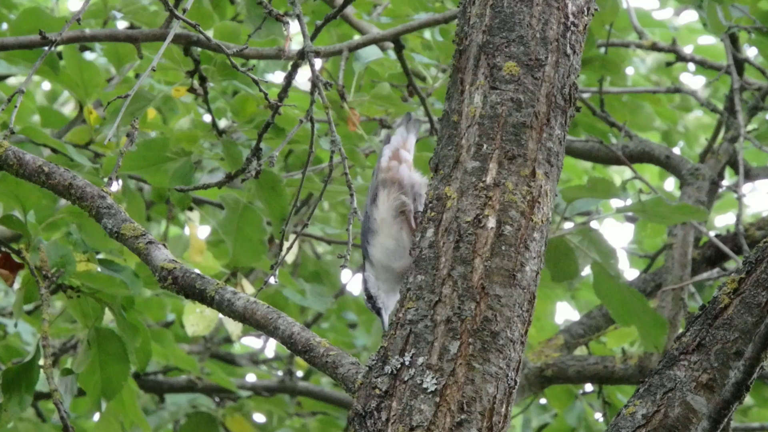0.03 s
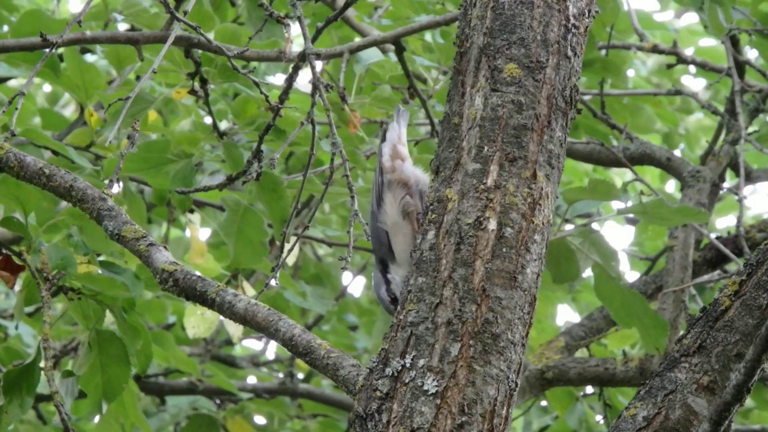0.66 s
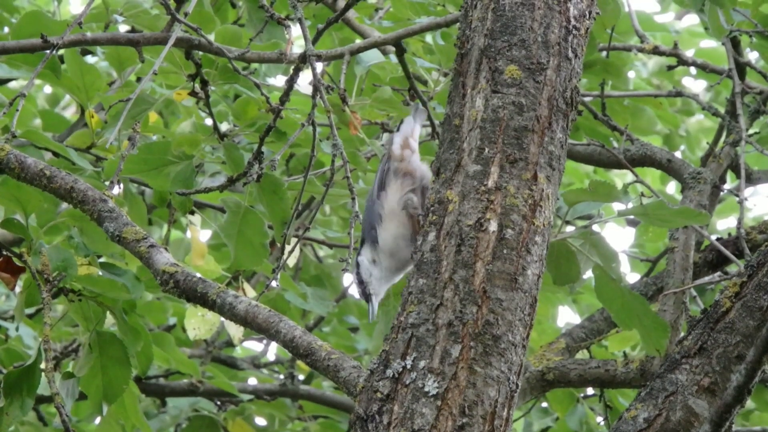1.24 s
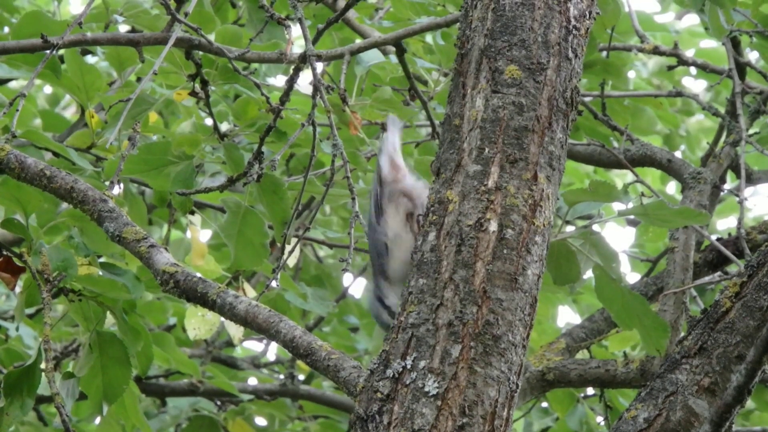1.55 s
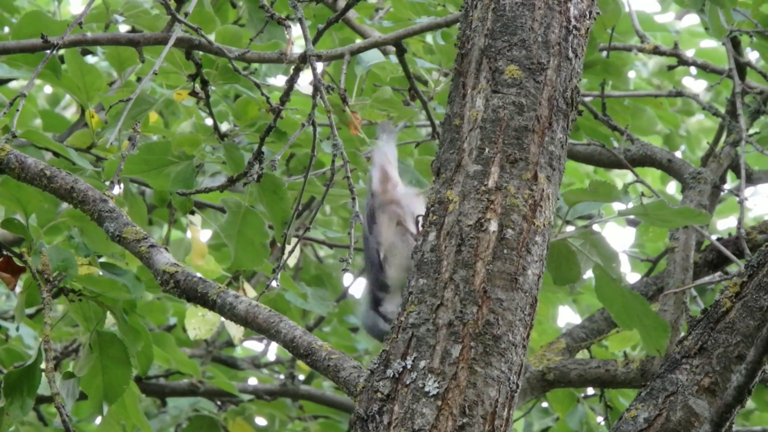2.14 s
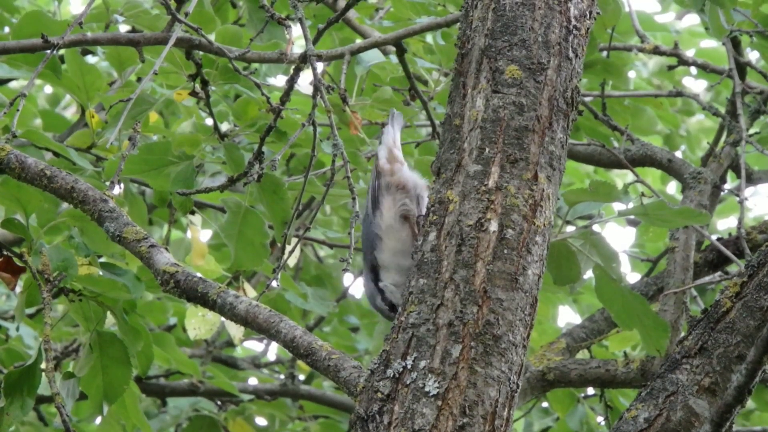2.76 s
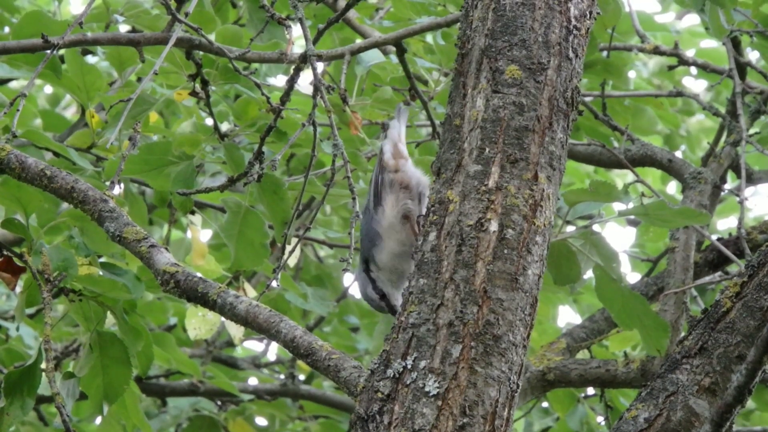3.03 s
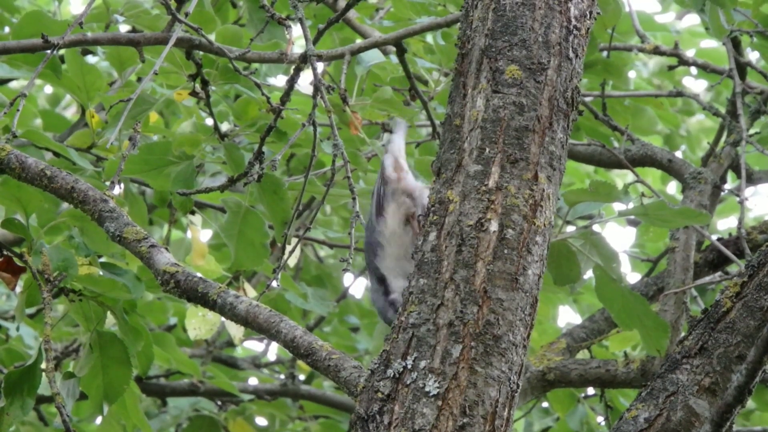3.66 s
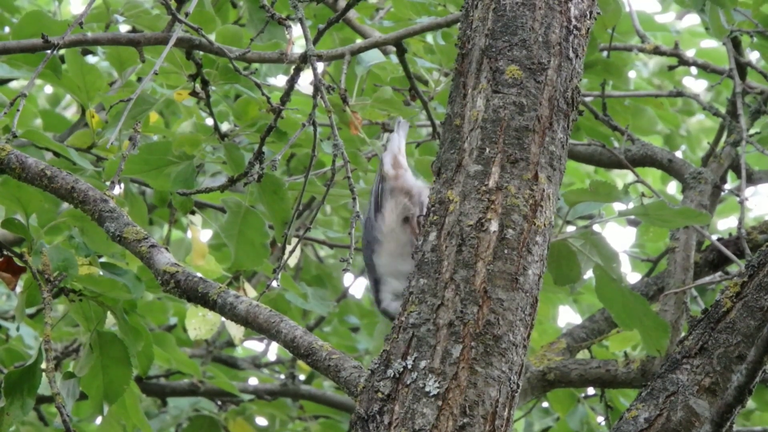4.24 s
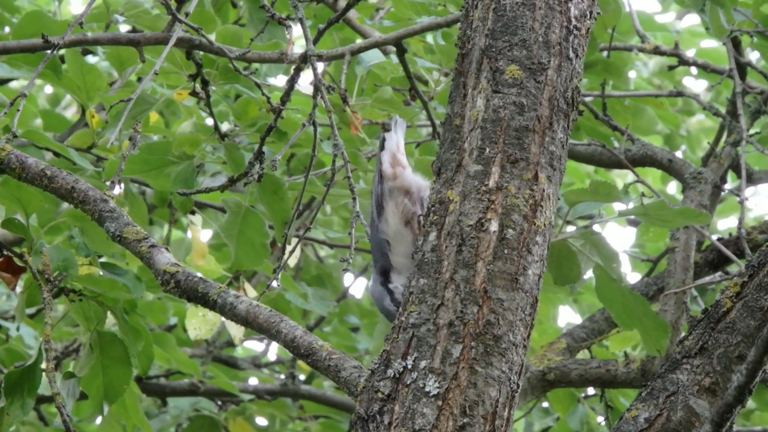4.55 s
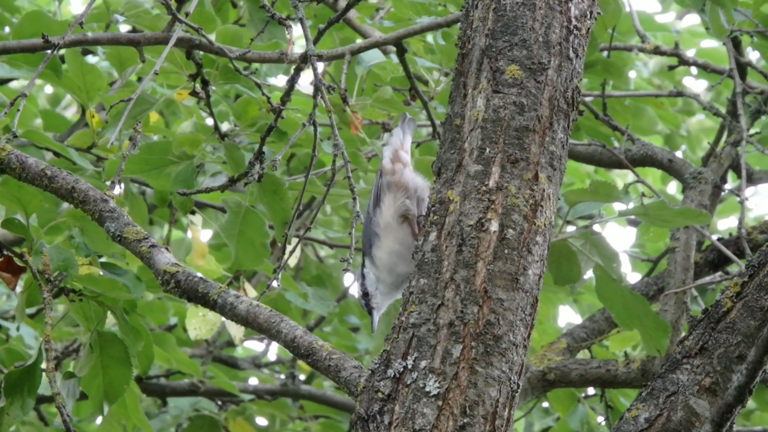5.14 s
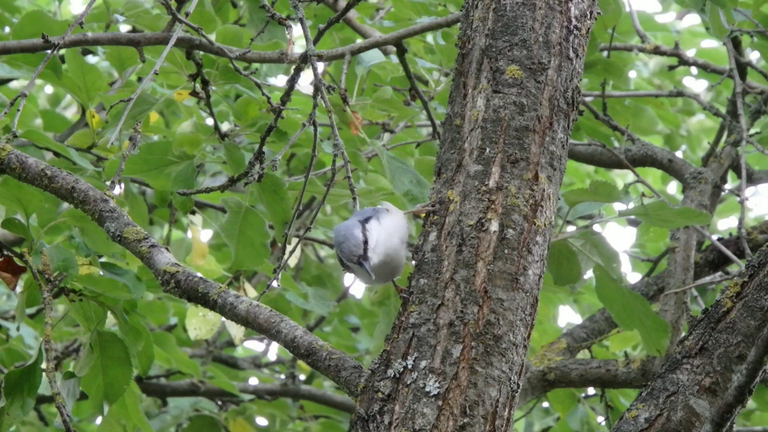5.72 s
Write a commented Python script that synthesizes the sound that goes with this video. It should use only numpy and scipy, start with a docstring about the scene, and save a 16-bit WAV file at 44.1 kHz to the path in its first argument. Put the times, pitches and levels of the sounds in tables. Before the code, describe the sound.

The low distant rush of a leafy wood fades in. Small birds give thin, very high calls about once a second, mixed with quick whistles, a soft repeated song and harsh falling rasps from deeper in the trees. A nuthatch taps lightly on bark and a few dull thuds sound nearby. Past the middle comes a quick twitter with two nasal squeaks. The calls echo briefly among the trunks, in narrow stereo.

```python
"""Thin high "tsit" calls and quick whistled slurs from small birds, fading in over the low distant rush
of a leafy wood. A soft song starts again and again, harsh rasps fall from deeper in the trees, and
there is one faint far run of notes, two nasal squeaks and a quick twitter with a high hiss in it.
A nuthatch taps and faintly scratches on the bark, and a few dull thuds sound nearby. Trunks and
leaves scatter every call on its way to a closely spaced pair of microphones."""
import sys
import numpy as np
from scipy import signal
from scipy.fft import rfft, irfft, next_fast_len
from scipy.io import wavfile
from scipy.ndimage import map_coordinates

SR = 44100
rng = np.random.default_rng(int(sys.argv[2]) if len(sys.argv) > 2 else 0)


def unload_audio(sound):
    """Save the sound as a 16-bit wav file, at the path given as the first command line argument."""
    columns = np.transpose(np.atleast_2d(sound))
    # keep every value between -1 and 1, then stretch to whole-number steps
    steps = np.round(np.clip(columns, -1, 1) * 32767)
    wavfile.write(sys.argv[1], SR, steps.astype(np.int16))


N = 255339


def amp(db):
    """Decibels to gain."""
    return 10 ** (np.asarray(db) / 20)


def unit(x):
    """Scale to rms 1."""
    return x / np.sqrt(np.mean(x ** 2) + 1e-20)


def along(points, hz):
    """Read (frequency [Hz], value) points at hz, on a log-frequency axis."""
    freqs, values = np.transpose(points)
    return np.interp(np.log(hz + 1), np.log(freqs + 1), values)


def wobble(rate, size):
    """A smooth random curve, rate knots a second."""
    knots = rng.standard_normal(size // 8 + 4)
    return map_coordinates(knots, [np.arange(size) * rate / SR], mode="mirror")


def filtered(x, response):
    """Filter x by a gain given as a function of frequency."""
    n = x.shape[-1]
    padded = next_fast_len(n + 8192)
    return irfft(rfft(x, padded) * response(np.fft.rfftfreq(padded, 1 / SR)), padded)[..., :n]


def hump(hz, centre_hz, octaves):
    """A bell on the log-frequency axis."""
    return np.exp(-.5 * (np.log2((hz + 1) / centre_hz) / octaves) ** 2)


def hiss(centre_hz, octaves):
    """Half a second of noise of rms 1 in one band."""
    return unit(filtered(rng.standard_normal(SR // 2), lambda hz: hump(hz, centre_hz, octaves)))


def clock():
    """Half a second of sample times, room for any one event."""
    return np.arange(SR // 2) / SR


def add(out, start, x):
    """Mix x into out from start, in seconds."""
    i = max(round(start * SR), 0)
    out[:, i:i + x.shape[1]] += x[:, :N - i]


def gate(u, edge):
    """Opens and closes softly while u runs from 0 to 1."""
    return np.sin(np.pi / 2 * np.clip(np.minimum(u, 1 - u) / edge, 0, 1)) ** 2


def phase_of(hz):
    """Running phase of a moving pitch."""
    return 2 * np.pi * np.cumsum(hz) / SR


def glide(start_hz, end_hz, bend):
    """Start, middle and end pitch of a slur; bend is the share of the way covered by half time."""
    return [start_hz, start_hz + bend * (end_hz - start_hz), end_hz]


def at_level(x, db, length):
    """Scale an event so that its energy equals db held for length seconds."""
    return amp(db) * unit(x) * np.sqrt(length * SR / x.shape[1])


def trees(x, wet_db, far_db, near_t60=0.21, far_t60=0.4, trunk_db=-2, trunk_count=7):
    """Direct sound, echoes off near trunks, scatter from leaves and a far wash, at the close pair."""
    t = clock()
    trunks = np.zeros((2, len(t)))
    delay_s = .002 + .03 * rng.random(trunk_count)
    strength = rng.standard_normal((2, trunk_count)) * amp(-60 * delay_s / near_t60)
    trunks[:, (delay_s * SR).astype(int)] = strength
    leaves = rng.standard_normal((2, len(t))) * amp(-60 * t / near_t60) * (1 - np.exp(-t / 0.0019))
    wash = rng.standard_normal((2, len(t))) * amp(-60 * t / far_t60) * (1 - np.exp(-t / 0.017))
    echoes = unit(amp(trunk_db) * unit(trunks) + unit(leaves) + amp(far_db) * unit(wash))
    wet_mid, wet_side = signal.fftconvolve(x[None], echoes / np.sqrt(len(t)), axes=1)[:, :len(t)]
    mid = x + amp(wet_db) * wet_mid
    side = (0.17 * amp(wet_db) + amp(-20)) * wet_side  # small: both microphones hear nearly the same
    return np.array([mid + side, mid - side])


def distant_rush(level_db=-51.5, drift_db=0.6):
    """The steady rush of the wood, more alike at the two microphones in the bass than in the treble."""
    # spectrum of the rush: (frequency [Hz], relative level [dB])
    spectrum = [(15, -72), (25, -26), (49, -15), (120, -9.5), (246, -2), (274, -6), (430, -3), (695, -8.5),
                (931, -4.5), (1030, -9), (1250, -6), (1500, -12.5), (4130, -22), (5240, -24),
                (14400, -34.5)]
    # likeness of left and right: (frequency [Hz], correlation [ratio])
    likeness = [(60, 0.52), (500, 0.49), (1200, 0.62), (3000, 0.31), (8000, 0.055), (13000, 0.33)]

    def mid_side_gains(hz):
        angle = np.arccos(np.clip(along(likeness, hz), -1, 1)) / 2
        return amp(along(spectrum, hz)) * [np.cos(angle), np.sin(angle)]

    mid, side = filtered(rng.standard_normal((2, N)), mid_side_gains)
    return unit(np.array([mid + side, mid - side])) * amp(level_db + drift_db * wobble(2.59, N))


def far_hum(waver=0.019, flutter_db=0.87):
    """A faint, wavering hum from far off, the same at both microphones."""
    # tones of the hum: (pitch [Hz], level [dB])
    tones = [(98, -74.5), (248, -68)]
    out = np.zeros(N)
    for hz, db in tones:
        tone = np.sin(phase_of(hz * (1 + waver * wobble(29, N))))
        out += amp(db) * unit(tone * amp(flutter_db * wobble(8, N)))
    return out


def thuds(t60=0.091, linger=9.9, whump_db=3, low_db=-8, wander_octaves=0.21):
    """Soft low blows nearby; the quicker the blow, the more it thumps, at its pitch and an octave down."""
    # dull blows: (time [s], swell [s], centre pitch [Hz], level [dB])
    blows = [(1.769, 0.0048, 563.4, -26), (1.897, 0.0063, 380, -43.5), (2.844, 0.01, 417, -43.5),
             (2.932, 0.0063, 315, -36.5), (3.901, 0.0096, 504, -38), (4.378, 0.0099, 524, -40),
             (5.358, 0.026, 457.6, -33), (5.717, 0.015, 334, -38), (5.745, 0.0049, 166, -40)]
    # spectrum of a blow's noise: (frequency [Hz], relative level [dB])
    spectrum = [(40, -23), (110, -13.5), (230, 3), (650, 1.5), (1000, -6.5), (2000, -20), (5000, -36.5),
                (14000, -65)]
    out, t = np.zeros((2, N)), clock()
    for start, swell, hz, db in blows:
        body = unit(filtered(rng.standard_normal(len(t)), lambda f: amp(along(spectrum, f))))
        phase = phase_of(hz * 2 ** (wander_octaves * wobble(257, len(t))))
        whump = unit(np.sin(phase) + amp(low_db) * np.sin(phase / 2))
        rise = np.minimum(t / swell, 1) ** 2
        decay = amp(-60 * np.maximum(t - swell, 0) / (t60 + linger * swell))  # slow blows linger
        thud = (body + amp(whump_db) * (0.0078 / swell) * whump) * rise * decay
        add(out, start, at_level(trees(thud, wet_db=-1, far_db=-6.5), db, length=0.014))
    return out * amp([[-.7], [.7]])


def noise_burst(hz, octaves, t60, db, attack_s=.001):
    """A decaying burst of noise with no ring, heard through the trees."""
    t = clock()
    noise = hiss(hz, octaves) * (1 - np.exp(-t / attack_s)) * amp(-60 * t / t60)
    return at_level(trees(noise, wet_db=-1.5, far_db=-9), db, length=0.014)


def nuthatch_taps():
    """Short knocks on the bark; the brighter the knock, the broader its band."""
    # knocks: (time [s], band centre [Hz], level [dB])
    knocks = [(1.046, 2350, -58), (1.483, 730, -44.5), (2.227, 1200, -51), (2.902, 1050, -42),
              (2.933, 1260, -49), (3.074, 1060, -46.5), (5.189, 3000, -46)]
    out = np.zeros((2, N))
    for start, hz, db in knocks:
        octaves = .57 + 0.36 * np.log2(hz / 1000)
        add(out, start, noise_burst(hz, octaves, t60=0.037, db=db))
    return out


def twitter_hiss_and_scrapes():
    """Two bursts of high hiss within the birds' quick twitter, then two faint scrapes on the bark."""
    # high noise bursts: (time [s], band centre [Hz], level [dB])
    bursts = [(4.289, 4700, -43), (4.334, 3870, -41), (5.07, 5570, -60), (5.13, 5040, -59)]
    out = np.zeros((2, N))
    for start, hz, db in bursts:
        add(out, start, noise_burst(hz, octaves=0.33, t60=0.33, db=db))
    return out


def whistle(length, pitches_hz, db, wet_db=-4, far_db=-14, edge=0.29,
            waver=0.022, flutter_db=3.5, overtone_db=-32, full_voice_db=-31.5):
    """A whistle that arcs through three pitches; the closer to full voice, the more air hisses with it."""
    t = clock()
    u = np.clip(t / length, 0, 1)
    arc_hz = np.polyval(np.polyfit([0, .5, 1], pitches_hz, 2), u)
    phase = phase_of(arc_hz * (1 + waver * wobble(1122, len(t))))
    flutter = amp(flutter_db * wobble(340, len(t)))
    tone = (np.sin(phase) + amp(overtone_db) * np.sin(2 * phase)) * flutter
    air = amp(-21 + 0.42 * (db - full_voice_db)) * hiss(5130, 0.69)
    note = (tone + air) * gate(u, edge)
    return at_level(trees(note, wet_db, far_db), db, length) * amp([[-1.1], [1.1]])


def far_run(start=1.232, beat_s=.049, note_s=0.033, first_hz=1806, step_hz=158, count=5):
    """Faint notes from a bird deep in the wood, each sliding up to where the next begins."""
    out = np.zeros((2, N))
    for k in range(count):
        hz = first_hz + k * step_hz
        pitches_hz = glide(hz, hz + step_hz, bend=0.52)
        add(out, start + k * beat_s, whistle(note_s, pitches_hz, db=-60.5, wet_db=8, far_db=0))
    return out


def song():
    """One soft phrase, often broken off early; a slower delivery stretches notes and gaps alike."""
    # rising notes of the phrase:
    # (offset [s], length [s], start pitch [Hz], middle pitch [Hz], end pitch [Hz], relative level [dB])
    notes = [(0, 0.014, 2500, 2930, 3160, 5), (0.111, 0.03, 3300, 4200, 4400, 5),
             (.206, .058, 2560, 3250, 3800, -1), (0.325, 0.029, 2280, 3600, 4600, 1)]
    # each delivery: (time [s], time stretch [ratio], notes sung [count], level [dB])
    phrases = [(0.162, 1, 4, -53), (1.979, 1.21, 3, -54.5), (4.026, .96, 2, -57), (5.7, 1.07, 1, -55.5)]
    out = np.zeros((2, N))
    for start, stretch, count, db in phrases:
        for offset, length, *pitches_hz, note_db in notes[:round(count)]:
            note = whistle(stretch * length, pitches_hz, db + note_db, far_db=1.5, edge=0.28)
            add(out, start + stretch * offset, note)
    return out


def squeaks(waver=0.015, hiss_db=-6, swell_db=6):
    """A low, hoarse pitch that rises and swells, nasal because only its overtones are heard."""
    # squeaks: (time [s], length [s], start pitch [Hz], end pitch [Hz], level [dB])
    calls = [(4.164, 0.062, 1178, 1504, -42), (4.361, 0.029, 1237, 1470, -43.5)]
    # overtones: (harmonic [number], relative level [dB])
    partials = [(2, -1.5), (3, -1), (4, 1.5), (5, -11)]
    out, t = np.zeros((2, N)), clock()
    for start, length, start_hz, end_hz, db in calls:
        u = np.clip(t / length, 0, 1)
        pitch_hz = np.interp(u, [0, 1], [start_hz, end_hz])
        phase = phase_of(pitch_hz * (1 + waver * wobble(1340, len(t))))
        tone = sum(amp(partial_db + 1.3 * wobble(206, len(t))) * np.sin(round(k) * phase)
                   for k, partial_db in partials)
        note = (tone + amp(hiss_db) * hiss(2700, 0.91)) * amp(swell_db * u) * gate(u, 0.28)
        add(out, start, at_level(trees(note, wet_db=-8, far_db=10), db, length))
    return out * amp([[-.8], [.8]])


def rasps(trill_hz=58, trill_depth=0.067, jitter_depth=0.0615, flutter_db=3, throat_hz=4150):
    """Falling notes from deeper in the trees, torn by a fast trill and chaotic jitter."""
    # harsh calls: (time [s], length [s], base pitch [Hz], level [dB])
    calls = [(0.867, 0.086, 4105, -34), (1.304, 0.073, 4150, -58), (1.504, 0.051, 3900, -41.5),
             (2.753, 0.091, 3877, -36.5), (3.172, .058, 4010, -45), (4.696, 0.083, 3910, -36)]
    # course of one call: (position [share of the call], pitch [ratio], relative level [dB])
    contour = [(0, 1.3, -31), (.2, 1.14, -8), (0.341, 1.11, -0.5), (.6, 1.01, -2.5), (0.819, .85, -4),
               (1, 0.68, -6)]
    out, t = np.zeros((2, N)), clock()
    share, ratio, swell_db = np.transpose(contour)
    loudest_db = max(call[-1] for call in calls)
    for start, length, hz, db in calls:
        u = t / length
        trill = trill_depth * np.sin(2 * np.pi * (trill_hz * t + rng.random()))
        jitter = jitter_depth * wobble(1700, len(t))
        phase = phase_of(hz * np.interp(u, share, ratio) * (1 + trill + jitter))
        tone = np.sin(phase) * amp(flutter_db * wobble(459, len(t)))
        # the throat stays tuned while the pitch falls through it
        tone = filtered(tone, lambda f: hump(f, throat_hz, octaves=0.52))
        # air hisses before the tone has swelled; the weaker the call, the more of it is hiss
        air = amp(-21 + 0.7 * (loudest_db - db)) * hiss(3860, 0.55)
        note = (tone * amp(np.interp(u, share, swell_db)) + air) * gate(u, 0.025)
        add(out, start, at_level(trees(note, wet_db=8, far_db=-7.5), db, length))
    return out * amp([[-.2], [.2]])


def slurs(leap_from_hz=2350, fall_bend=.58):
    """Quick single whistles: the rising ones leap from one low pitch, the falling ones share one bend."""
    # rising whistles: (time [s], length [s], end pitch [Hz], rise done by halfway [share], level [dB])
    rising = [(0.636, 0.042, 5040, 0.77, -33), (2.389, 0.045, 5040, 0.9, -35.5),
              (3.643, 0.036, 5150, 0.72, -37), (4.284, 0.054, 4560, 0.99, -41),
              (4.319, 0.019, 3650, .5, -52), (4.383, 0.034, 3660, .77, -36.5)]
    # falling whistles: (time [s], length [s], start pitch [Hz], end pitch [Hz], level [dB])
    falling = [(3.875, .022, 3430, 2760, -59.5), (3.933, 0.05, 4050, 2800, -56),
               (4.047, 0.043, 3830, 2810, -54), (4.216, 0.0152, 2830, 2250, -41),
               (4.224, 0.017, 3780, 2540, -39), (4.332, .014, 4180, 2200, -40.5)]
    out = np.zeros((2, N))
    for start, length, end_hz, bend, db in rising:
        add(out, start, whistle(length, glide(leap_from_hz, end_hz, bend), db))
    for start, length, start_hz, end_hz, db in falling:
        add(out, start, whistle(length, glide(start_hz, end_hz, fall_bend), db))
    return out


def tsits(length=.026, waver=0.0097, overtone_db=-36, hiss_db=-28):
    """Nearly pure, very high notes just right of centre, flicking up and down with a thin airy edge."""
    # thin calls: (time [s], base pitch [Hz], level [dB], left minus right [dB])
    calls = [(.520, 6650, -26, -2.5), (1.566, 6720, -28, -3), (2.292, 6600, -25.5, -3),
             (3.528, 6850, -27.5, -2.5), (4.197, 6670, -26.5, -2)]
    # course of one call: (position [share of the call], pitch [ratio], relative level [dB])
    contour = [(0, .95, -5), (.17, 1.035, -14), (.36, 1.02, -2), (.56, .97, 1), (.78, 1, -1),
               (1, 1.21, -10.5)]
    out, t = np.zeros((2, N)), clock()
    share, ratio, swell_db = np.transpose(contour)
    u = t / length
    for start, hz, db, pan_db in calls:
        phase = phase_of(hz * np.interp(u, share, ratio) * (1 + waver * wobble(1012, len(t))))
        tone = np.sin(phase) + amp(overtone_db) * np.sin(2 * phase)
        air = amp(hiss_db) * hiss(7200, 0.086)
        note = (tone + air) * amp(np.interp(u, share, swell_db)) * gate(u, 0.11)
        pan = amp([[pan_db / 2], [-pan_db / 2]])
        add(out, start, at_level(trees(note, wet_db=2, far_db=-17), db, length) * pan)
    return out


def scene():
    """Bird calls, thuds and bark sounds over the background of the wood, from one spot in the trees."""
    birds = tsits() + song() + slurs() + far_run() + rasps() + squeaks()
    short_noises = thuds() + nuthatch_taps() + twitter_hiss_and_scrapes()
    background = distant_rush() + far_hum()
    return background + short_noises + birds


def record(dry, fade_start_s=0.081, fade_length_s=0.21, top_hz=14350):
    """The microphone signal fades in and keeps nothing above its band limit."""
    fade = np.clip((np.arange(N) / SR - fade_start_s) / fade_length_s, 0, 1) ** 1.5
    return filtered(dry * fade, lambda hz: hz < top_hz)


dry = scene()
out = record(dry)
unload_audio(out)
```